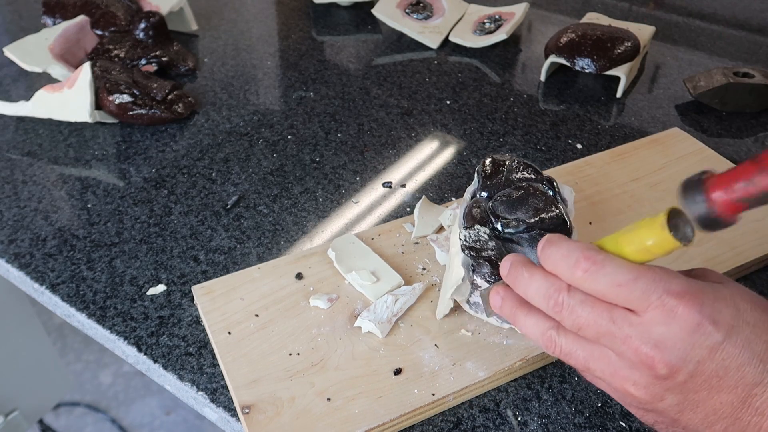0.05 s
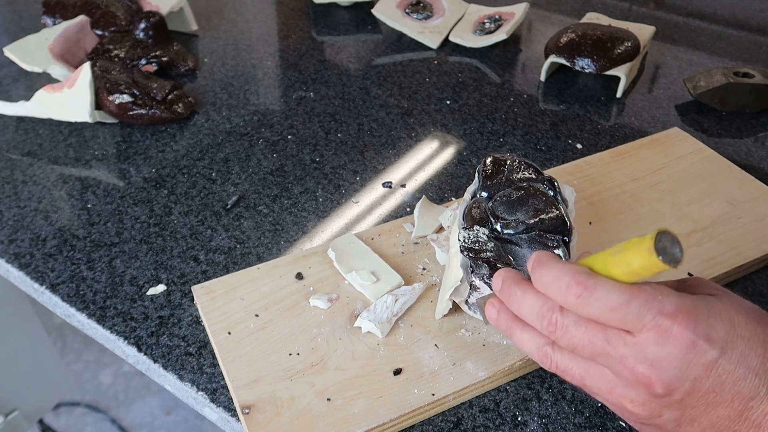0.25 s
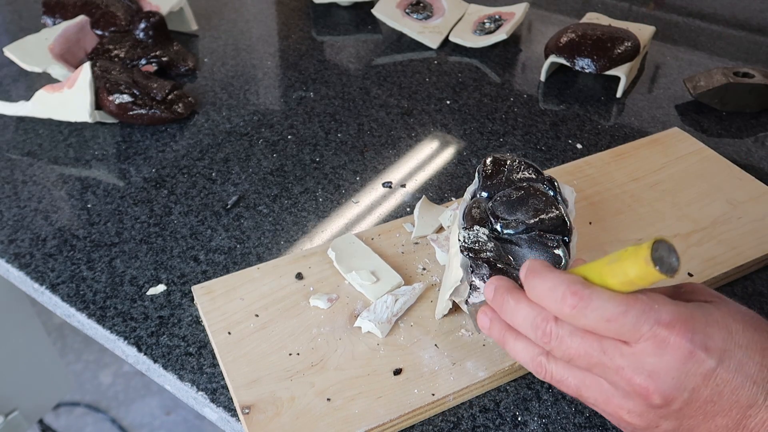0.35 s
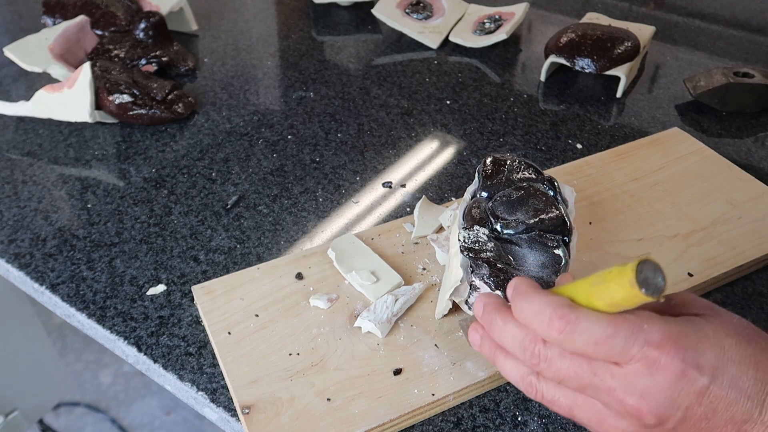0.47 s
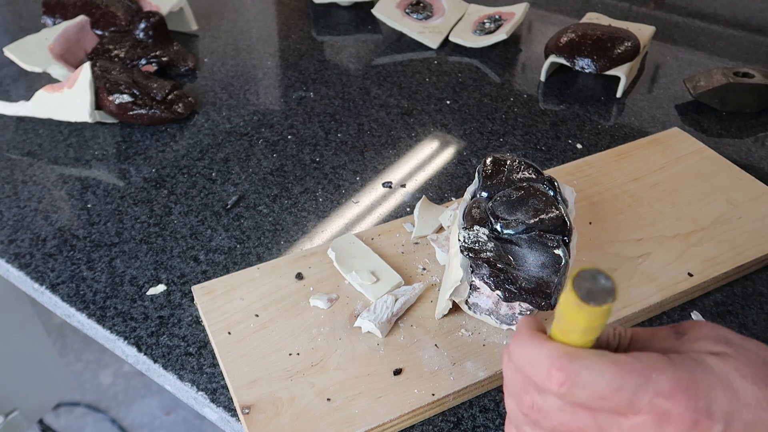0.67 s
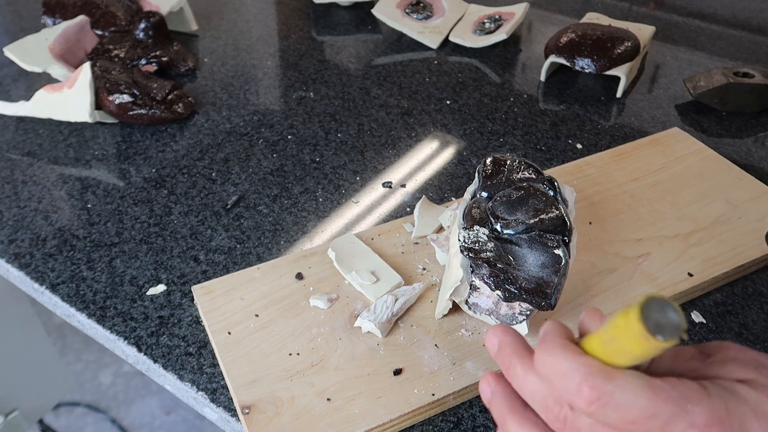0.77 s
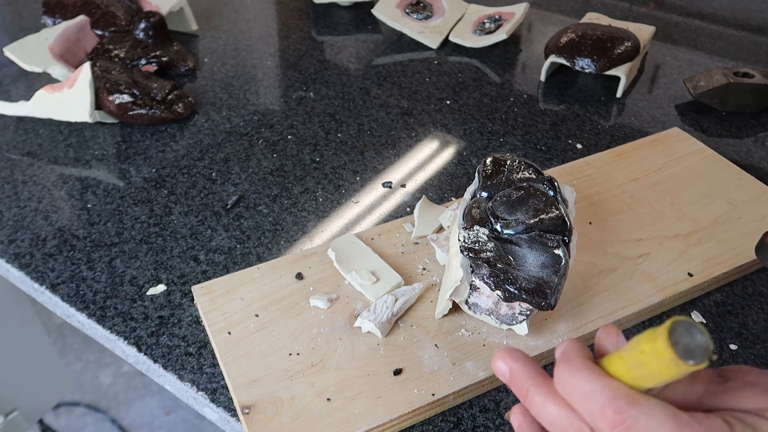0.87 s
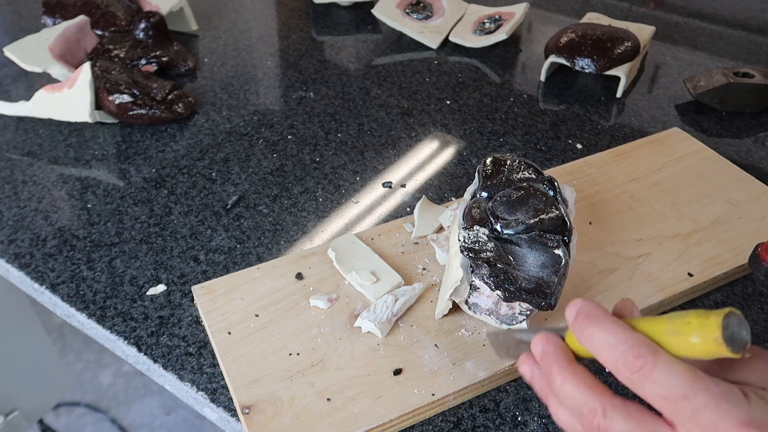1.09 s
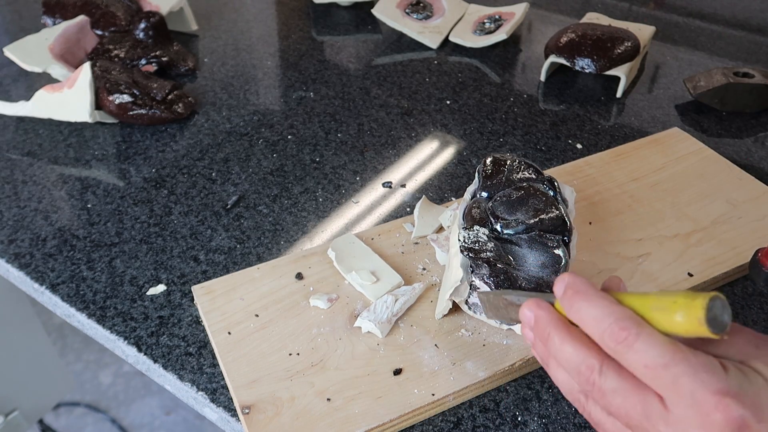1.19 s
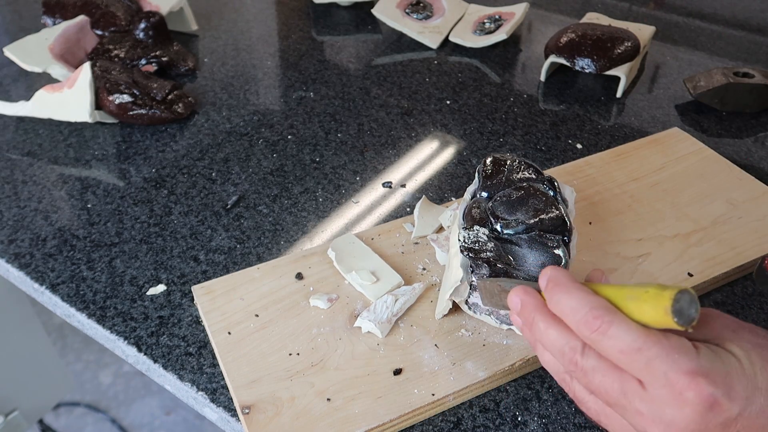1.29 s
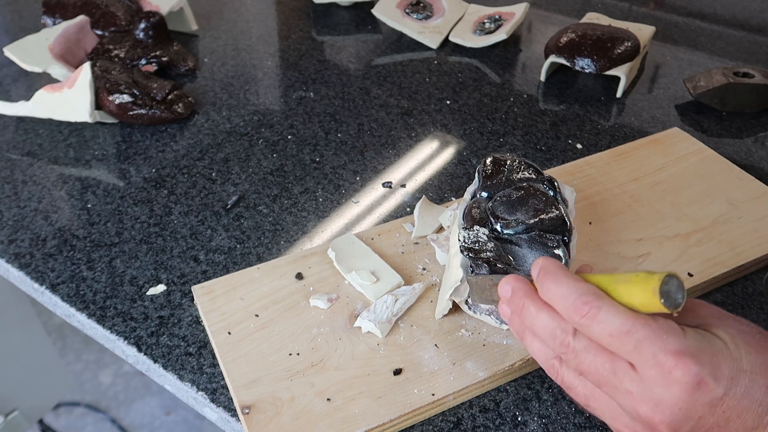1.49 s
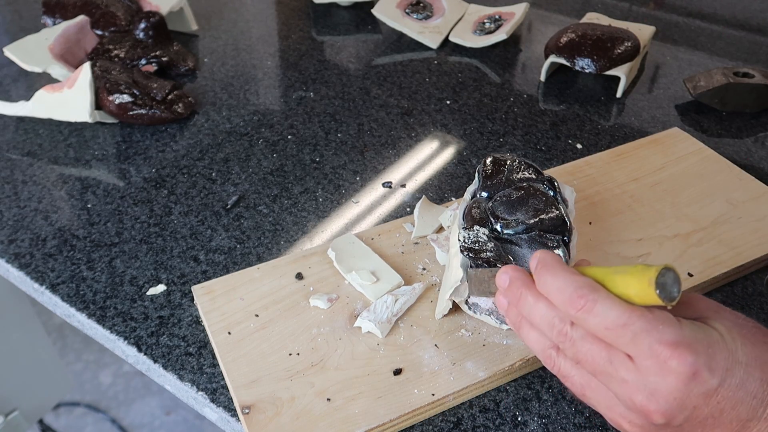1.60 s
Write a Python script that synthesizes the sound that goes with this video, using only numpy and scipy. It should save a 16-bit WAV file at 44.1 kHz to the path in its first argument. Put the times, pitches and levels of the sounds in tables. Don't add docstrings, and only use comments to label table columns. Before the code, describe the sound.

Single hard hammer blow on a steel chisel, chips patter, then faint light taps on clay

```python
import sys
import numpy as np
from scipy import signal
from scipy.fft import rfft, irfft, next_fast_len
from scipy.io import wavfile
from scipy.ndimage import map_coordinates

SR = 44100
rng = np.random.default_rng(int(sys.argv[2]) if len(sys.argv) > 2 else 0)


def bounce(signal):
    frames = np.transpose(np.atleast_2d(signal))
    limited = np.clip(frames, -1, 1)
    pcm = np.round(limited * 32767).astype(np.int16)
    wavfile.write(sys.argv[1], SR, pcm)


def amplitude_ratio(level_db):
    exponent = np.asarray(level_db, float) / 20
    return 10 ** exponent


N = 72765
BLOW_S = .1243


def unit(x):
    return x / np.sqrt(np.mean(x ** 2) + 1e-20)


def along(points, hz):
    f, v = np.transpose(points)
    return np.interp(np.log(hz + 1), np.log(f + 1), v)


def filtered(x, response):
    m = next_fast_len(N + SR // 2)
    spectrum = rfft(x, m) * response(np.fft.rfftfreq(m, 1 / SR))
    return irfft(spectrum, m)[..., :N]


def placed(start_s, x):
    return np.pad(x, (round(start_s * SR), N))[:N]


def band(f, hz, width):
    return 1j * f * width / (hz * hz - f * f + 1j * f * width)


def ring(modes, rise_s):
    longest_s = max(t60 for *_, t60 in modes)
    t = np.arange(int(longest_s * SR)) / SR
    total = sum(amplitude_ratio(db - 60 * t / t60) * np.sin(2 * np.pi * hz * t) for hz, db, t60 in modes)
    return total * (1 - np.exp(-t / rise_s))


def crack(db, t60):
    t = np.arange(2048) / SR
    return amplitude_ratio(db - 60 * t / t60) * rng.standard_normal(2048)


def ports(x):
    lead_s = .000038
    side = np.array([[-1], [1]])
    return filtered(x, lambda hz: np.exp(1j * np.pi * hz * lead_s * side))


def floor():
    # f/Hz, level/dB per Hz
    hiss_tone = [(100, -11.5), (200, 1.5), (450, 1.5), (900, -5.5), (2400, -9), (5000, -14), (9000, -23.5),
                 (12500, -35.5)]
    rumble_tone = [(25, -15), (40, -9), (60, 1.5), (85, -5), (120, -5), (170, -8.5), (300, -19),
                   (600, -34.5)]
    hiss_db, rumble_db = -62, -63.5
    swell = map_coordinates(rng.standard_normal(30), [np.arange(N) * 12 / SR])
    hiss = filtered(rng.standard_normal((2, N)), lambda hz: amplitude_ratio(along(hiss_tone, hz)) * (hz < 13500))
    rumble = filtered(rng.standard_normal(N), lambda hz: amplitude_ratio(along(rumble_tone, hz)) * (hz < 900))
    return amplitude_ratio(hiss_db) * unit(hiss) + amplitude_ratio(rumble_db) * unit(rumble) * amplitude_ratio(3.4 * swell)


def rubbing():
    # start t/s, length t/s, level/dB, centre f/Hz, width f/Hz
    rubs = [
        (0, .06, -72, 4500, 1800),
        (.07, .03, -71, 2700, 400),
        (1.0, .11, -73, 3400, 2500),
        (1.25, .05, -71, 2500, 400),
        (1.28, .05, -69, 3100, 350),
        (1.28, .045, -71, 4200, 200),
        (1.34, .1, -71, 4000, 2500),
        (1.385, .035, -66, 4800, 40),
        (1.3, .03, -68, 300, 60),
    ]
    out = np.zeros(N)
    f = np.fft.rfftfreq(8192, 1 / SR)
    for start_s, length_s, db, hz, width in rubs:
        grain_level = amplitude_ratio(2.5 * rng.standard_normal(128).repeat(64))
        grains = rng.standard_normal(8192) * grain_level
        tone = unit(irfft(rfft(grains) * band(f, hz, width)))
        progress = np.clip(np.arange(len(tone)) / SR / length_s, 0, 1)
        stroke = np.sqrt(np.abs(np.sin(np.pi * progress)))
        out += placed(start_s, amplitude_ratio(db) * tone * stroke)
    return ports(out)


def smear():
    # f/Hz, width f/Hz, level/dB
    colours = [(7400, 900, 0.5), (3980, 440, -6.5), (2230, 1700, -9), (11000, 2500, -21)]
    level_db, t60, length_s = -9.5, .028, 0.01
    before = BLOW_S - np.arange(N) / SR
    colour = lambda f: sum(amplitude_ratio(db) * band(f, hz, width) for hz, width, db in colours)
    noise = unit(filtered(rng.standard_normal(N), colour))
    swell = amplitude_ratio(level_db - 60 * np.abs(before) / t60) * (before > 0)
    fade_in = np.clip((length_s - before) / .003, 0, 1)
    return ports(noise * swell * fade_in)


def blow():
    # f/Hz, level/dB, t60/s
    steel = [(7093, 6, 0.0078), (7680, 3.5, 0.0075), (6560, 5.5, .005), (3970, 4, .006), (4253, -2, .006),
             (5770, -3, 0.0032), (10400, -2.5, .006), (11280, -2.5, 0.0082), (12700, -4, .004)]
    body = [(1602, 10.5, .012), (1210, 3.5, 0.021), (1404, 4, .02), (2226, -0.5, 0.012), (2750, 2.5, 0.011),
            (447, 1, 0.01), (290, -6.5, 0.0047), (664, -4, 0.017), (800, -7, .012)]
    body_lag_s, body_rise_s = .0011, 0.00047
    steel_sound = placed(BLOW_S, ring(steel, .00005)) + placed(BLOW_S, crack(1, .005))
    return steel_sound + placed(BLOW_S + body_lag_s, ring(body, body_rise_s))


def slap_back(hit):
    # delay t/s, level/dB, left over right level/dB
    slaps = [
        (.0038, -9, 2),
        (.0052, -11.5, -2.5),
        (.0120, -8, -2),
        (0.0148, -17.5, 1.5),
        (0.0199, -13.5, -0.5),
        (0.031, -22.5, 1),
    ]
    dull_hz = 3000

    def response(hz):
        total = 0
        for delay_s, db, pan_db in slaps:
            gain = amplitude_ratio(db + np.array([[pan_db], [-pan_db]]) / 2)
            total = total + gain * np.exp(-2j * np.pi * hz * delay_s)
        return total / (1 + 1j * hz / dull_hz)

    return filtered(hit, response)


def table():
    # f/Hz, level/dB, t60/s
    boom_modes = [(98, -17, 0.57), (166, -24, .4)]
    hum_modes = [(126, -37.5, .9)]
    beat_s = .115
    boom = ring(boom_modes, 0.025)
    boom = boom * np.sin(np.pi * np.arange(len(boom)) / SR / beat_s)
    return placed(BLOW_S, boom) + placed(BLOW_S, ring(hum_modes, .1))


def room(x):
    # f/Hz, t60/s
    decay = [(100, 0.92), (250, 0.49), (700, .4), (1450, 0.42), (2500, .37), (4500, .36), (7500, .28),
             (11000, 0.18), (13500, .07)]
    # f/Hz, share
    alike = [(100, 1), (600, .94), (1400, 0.99), (3000, 0.38), (6800, -0.41), (14000, 0.37)]
    gap_s, rise_s = .008, 0.0039
    hz, t, z = signal.stft(rng.standard_normal((2, SR)), SR, nperseg=256)
    turn = np.arccos(np.clip(along(alike, hz), -1, 1))[:, None] / 2
    fading = z * amplitude_ratio(-60 * t / along(decay, hz)[:, None])
    mid, side = signal.istft(fading * [np.cos(turn), np.sin(turn)], SR, nperseg=256)[1]
    rise = 1 - np.exp(-np.arange(len(mid)) / SR / rise_s)
    tail = np.array([mid + side, mid - side]) * rise
    late = np.pad(x, (round(gap_s * SR), 0))[None]
    return signal.fftconvolve(late, tail / np.linalg.norm(tail[0]), axes=1)[:, :N]


def blow_in_room():
    # f/Hz, level/dB
    power_tone = [(60, -15.5), (280, -18), (420, -10), (1000, -11.5), (1540, -0.5), (2100, -10),
                  (5000, -17), (7200, -13), (9500, -22.5), (12500, -27.5)]
    spread = filtered(placed(BLOW_S, [1.]), lambda hz: amplitude_ratio(30.5 + along(power_tone, hz)))
    return room(spread)


def chips():
    # t/s, level/dB, f/Hz, t60/s
    landings = [
        (.178, -29, 5280, .13),
        (.185, -35, 5330, .12),
        (.2755, -26, 3200, .01),
        (.2765, -25, 2200, .014),
        (.2762, -29, 5600, .007),
        (.276, -29, 4300, .007),
        (.276, -38, 12000, .008),
        (.288, -32, 2600, .04),
        (.2885, -36, 5000, .01),
    ]
    return sum(placed(s, ring([(hz, db, t60)], 0.00033)) for s, db, hz, t60 in landings)


def taps():
    # t/s, level/dB
    touches = [
        (1.4451, -38),
        (1.4554, -43.5),
        (1.6487, -43),
    ]
    # f/Hz, level/dB, t60/s
    mould = [(2582.6, -3.5, .24), (2602, -7, 0.11), (2667, -10, .15), (1412, -3.5, .025),
             (1244.6, -2, 0.021), (1794, -10.5, 0.1), (2106, -4, 0.024), (2360, 7, 0.01),
             (6322, -18, 0.041), (303, -6, 0.033), (917, -9.5, 0.022), (3193, -18, 0.015)]
    out = np.zeros(N)
    for s, db in touches:
        out += amplitude_ratio(db) * (placed(s, ring(mould, 0.00042)) + placed(s, crack(-13, 0.0066)))
    return out


def scene():
    low_cut_hz, small_room_db = 79, -11
    hit = blow()
    small = chips() + taps()
    contacts = ports(hit) + slap_back(hit) + blow_in_room() + table()
    contacts = contacts + ports(small) + amplitude_ratio(small_room_db) * room(small)
    contacts = filtered(contacts, lambda hz: (1j * hz / (low_cut_hz + 1j * hz)) ** 2)
    return contacts + smear() + rubbing() + floor()


def roll_off(x):
    return signal.sosfilt(signal.butter(12, 15480, fs=SR, output="sos"), x)


def record(dry):
    duck_db, duck_s, hold_s, recover_s = -7.5, 0.024, 0.53, 0.85
    clip_top, clip_hard, out_cut_hz = 1, 6, 29
    t = np.arange(N) / SR - BLOW_S
    duck = np.clip(t / duck_s, 0, 1) * np.clip(1 - (t - hold_s) / recover_s, 0, 1)
    x = dry * amplitude_ratio(duck_db * duck)
    clipped = x / (1 + np.abs(x / clip_top) ** clip_hard) ** (1 / clip_hard)
    cut = clipped - x
    offset = filtered(cut, lambda hz: 1 / (1 + (hz / out_cut_hz) ** 2))
    return roll_off(x + cut - offset)


dry = scene()
out = record(dry)
bounce(out)
```